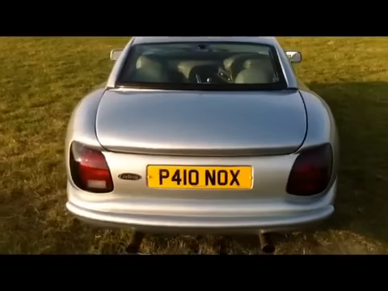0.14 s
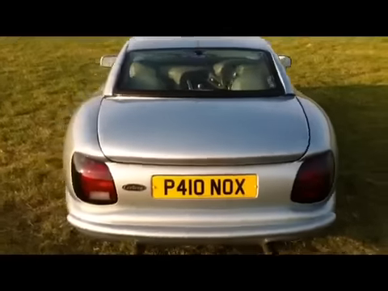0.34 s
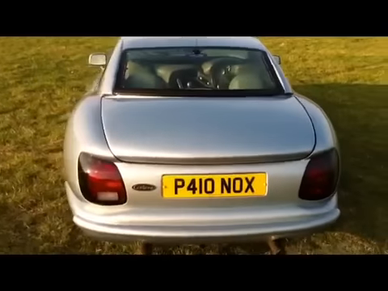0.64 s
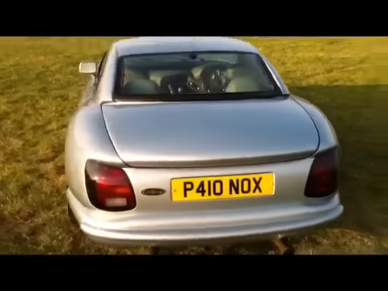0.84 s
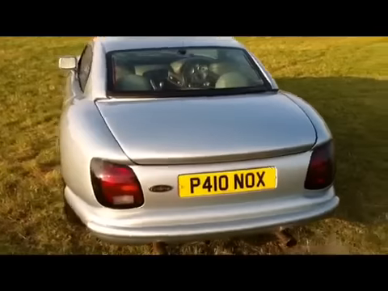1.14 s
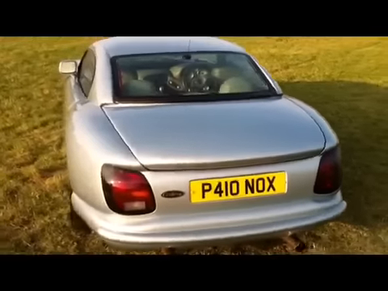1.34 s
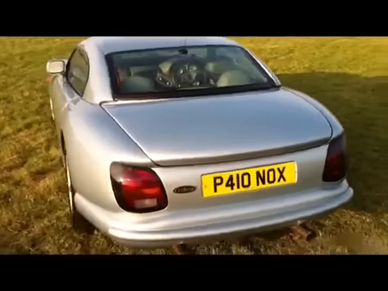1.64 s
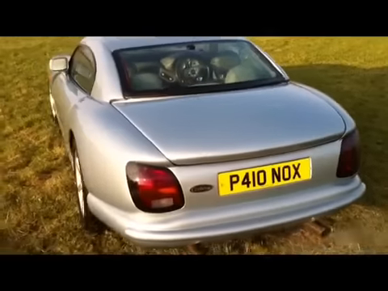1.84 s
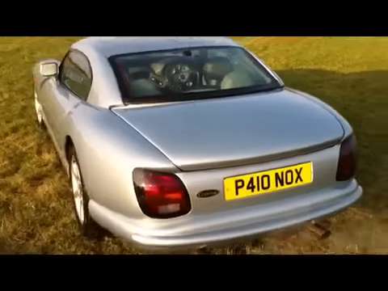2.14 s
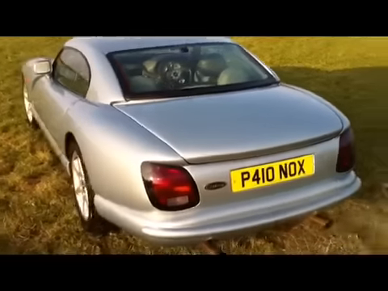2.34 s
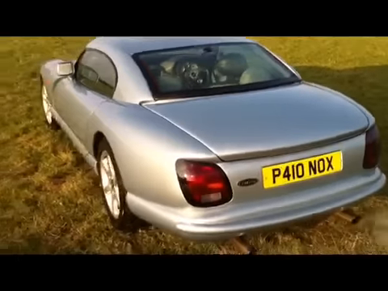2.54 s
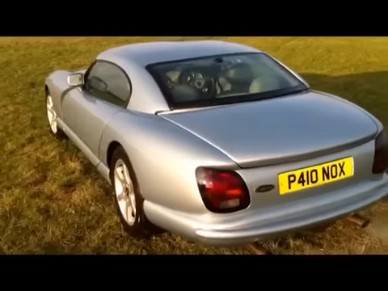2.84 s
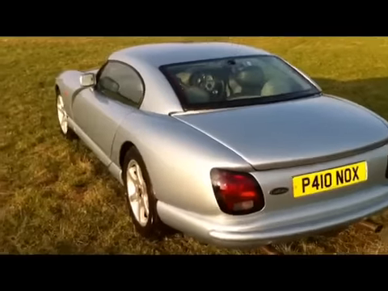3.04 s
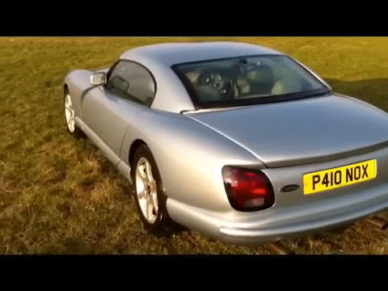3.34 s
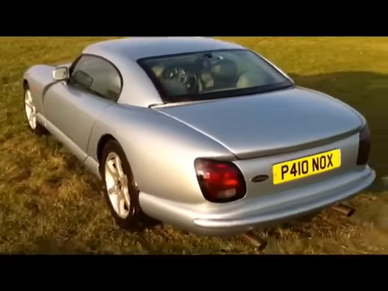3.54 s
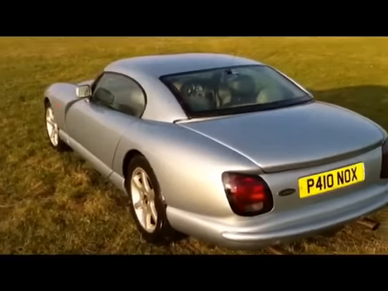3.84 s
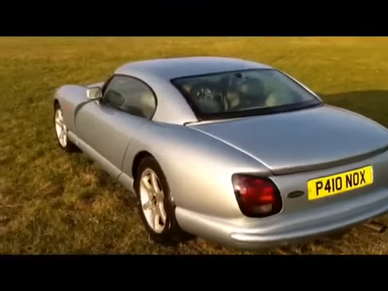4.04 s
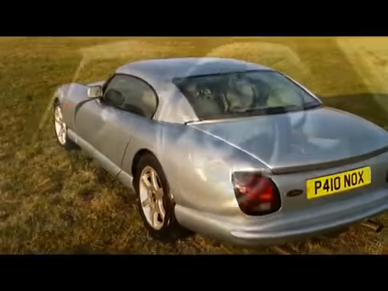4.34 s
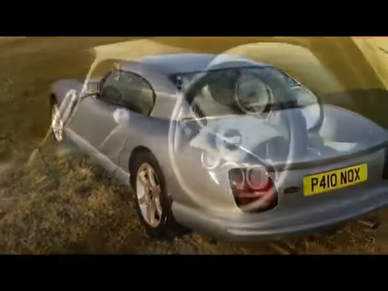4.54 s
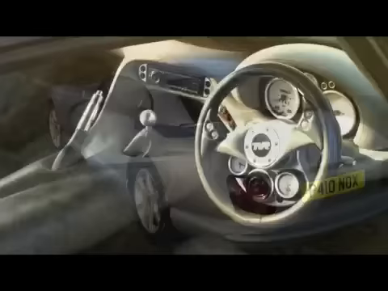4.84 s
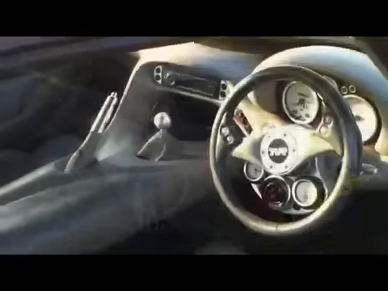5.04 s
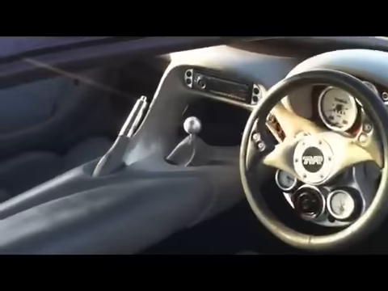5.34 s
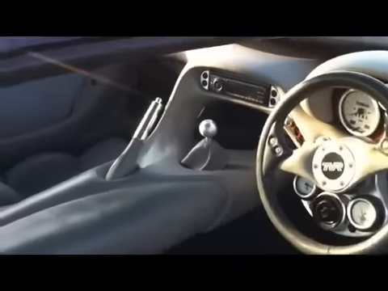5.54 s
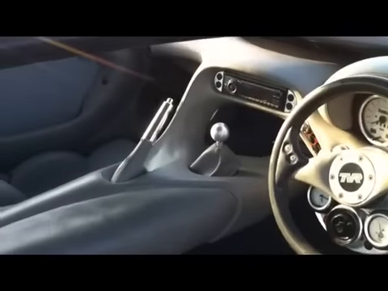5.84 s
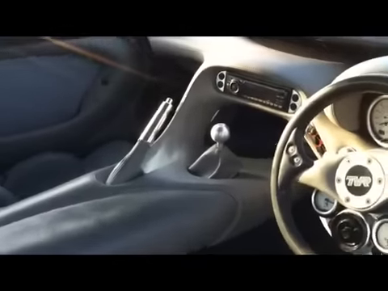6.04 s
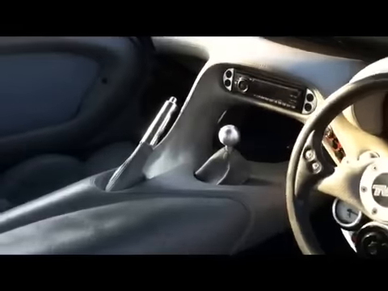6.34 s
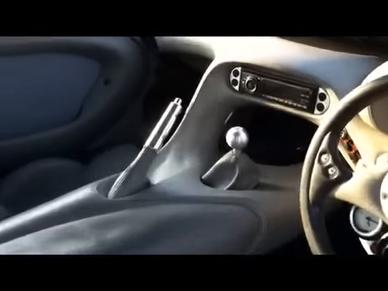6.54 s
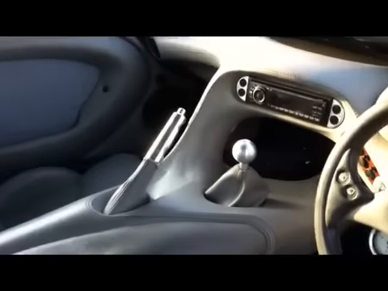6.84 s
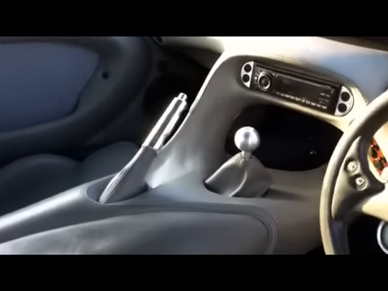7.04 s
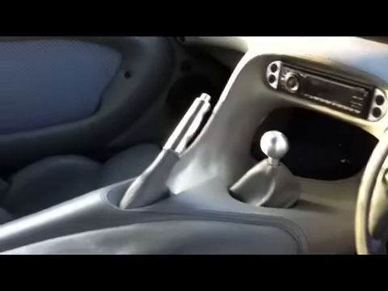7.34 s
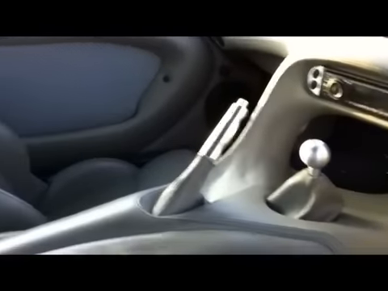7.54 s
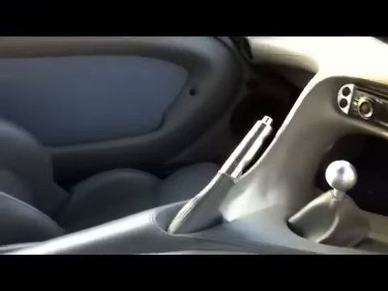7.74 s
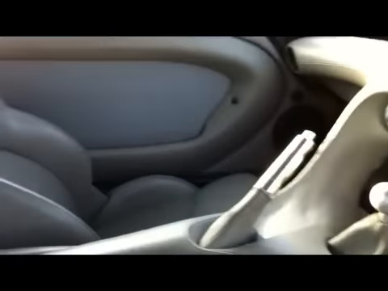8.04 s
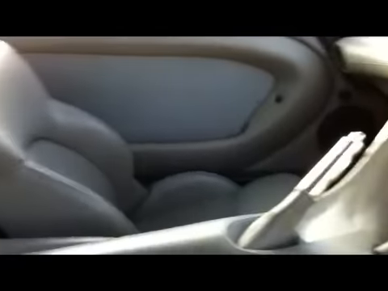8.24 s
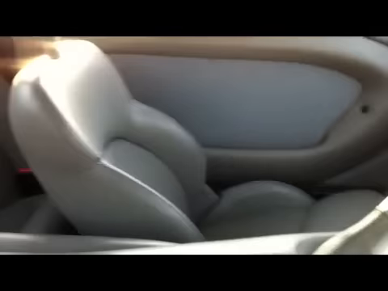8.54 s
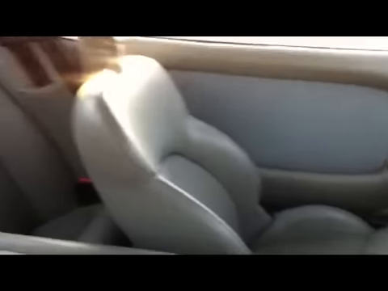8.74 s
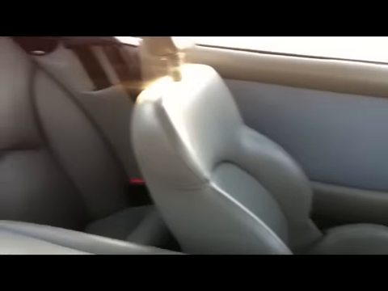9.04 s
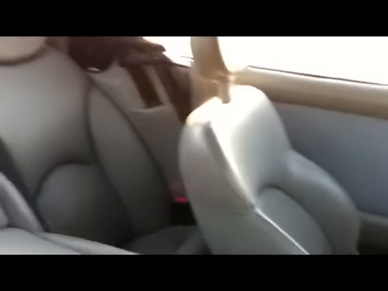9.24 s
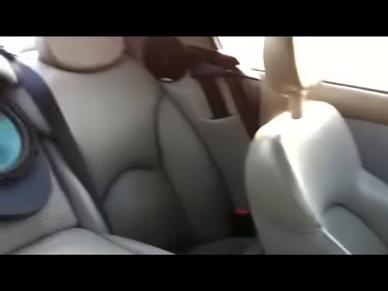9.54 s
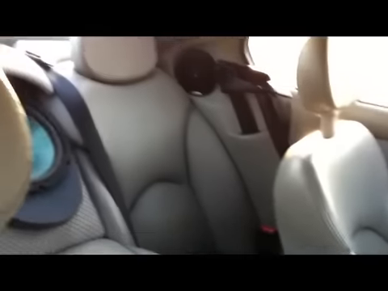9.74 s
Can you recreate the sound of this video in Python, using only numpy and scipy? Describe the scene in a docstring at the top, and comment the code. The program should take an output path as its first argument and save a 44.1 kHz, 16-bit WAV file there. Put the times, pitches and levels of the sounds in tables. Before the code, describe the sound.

Close, burbling sports car idle with crackling exhaust and ragged wind-like blasts, switching to a softer, hollow rumble and hiss at the open door.

```python
"""A sports car's eight-cylinder engine idles lumpily on a lawn. First it is heard at the tail pipes: spiked firings
ring pipe resonances and crack in the tips, gusts of exhaust gas (shaped noise) buffet the microphone, feet brush
the grass (noise bursts), and a whine from the engine bay (resonant noise) fades in. Then, overlapping for a second,
the same idle comes through the open door: a duller rumble and ring, the bay's noise hiss, and two taps on the trim."""
import sys
import numpy as np
from scipy import signal
from scipy.fft import rfft, irfft, next_fast_len
from scipy.io import wavfile
from scipy.ndimage import uniform_filter1d, minimum_filter1d, map_coordinates

SR = 44100
rng = np.random.default_rng(int(sys.argv[2]) if len(sys.argv) > 2 else 0)


def invert_db(x):
    """Field ratio 10**(x/20) for x, a level in decibels (scalar or array-like)."""
    u = np.asarray(x, float) / 20
    return 10 ** u


def pcm_store(signal):
    """Save signal as 16-bit PCM."""
    levels = np.round(np.clip(np.atleast_2d(signal), -1, 1) * 32767)
    wavfile.write(sys.argv[1], SR, levels.astype(np.int16).T)


N = 435708
REAR_ENDS_S, DOOR_STARTS_S = 5.165, 4.174
TOP_WIDTH_HZ = 19  # of the pipe's top ring

# Breathy bands from the engine bay. Each row: centre in Hz, width in Hz, relative level in dB, all per pass.
WHINE_BANDS = [(2376, 67, -1), (3520, 1830, -8.5), (11000, 1800, -14.5)]
# Steady engine orders. Each row: multiple of one bank's firing rate, rear and door level in dB over the rumble.
HUM_ORDERS = [(2, -21, -17.5), (3, -10.5, -12), (4, -14.5, -13)]


def unit(x):
    """Scale to rms 1."""
    return x / np.sqrt(np.mean(x ** 2) + 1e-20)


def curves(rows):
    """One value per sample for each column after the time."""
    time_s, *columns = np.transpose(rows)
    return [np.interp(np.arange(N) / SR, time_s, c) for c in columns]


def wobble(rate):
    """A smooth random curve, rate knots a second."""
    knots = rng.standard_normal(int(N * rate / SR) + 4)
    return map_coordinates(knots, [np.arange(N) * rate / SR])


def filtered(x, response):
    """x times a complex response of frequency."""
    m = next_fast_len(N + SR // 2)
    return irfft(rfft(x, m) * response(np.fft.rfftfreq(m, 1 / SR)), m)[:N]


def coloured(x, spectrum):
    """x through (Hz, dB) points on a log axis, rms 1."""
    f, db = np.transpose(spectrum)
    return unit(filtered(x, lambda hz: invert_db(np.interp(np.log(hz + 1), np.log(f), db, -120, -120))))


def resonant(x, modes):
    """x rings through (Hz, width Hz, dB) resonances of alternating sign, rms 1."""
    def response(f):
        return sum((-1) ** k * invert_db(db) * 1j * f * w / (c * c - f * f + 1j * f * w)
                   for k, (c, w, db) in enumerate(modes))
    return unit(filtered(x, response))


def wavering(x, centre_hz, width_hz):
    """x rings through one resonance whose centre moves, plus a sustained tone at that centre, rms 1."""
    sustained = .85  # amplitude of the tone beside a ring of rms 1
    phase = 2 * np.pi * np.cumsum(centre_hz) / SR

    def slow(v):
        return filtered(v, lambda hz: 1 / (1 + 2j * hz / width_hz))

    ring = slow(x * np.cos(phase)) * np.cos(phase) + slow(x * np.sin(phase)) * np.sin(phase)
    return unit(unit(ring) + sustained * np.cos(phase))


def puffs(train, t60, rise):
    """White noise that flares at each spike of the train and dies away; times in s."""
    t = np.arange(SR // 8) / SR
    shape = invert_db(-60 * t / t60) * (1 - np.exp(-t / rise))
    return signal.fftconvolve(train, shape / shape.max())[:N] * rng.standard_normal(N)


def bursts(rows, spectrum):
    """Coloured noise under (s, dB, t60 s, rise s) envelopes."""
    t, swell = np.arange(SR // 4) / SR, np.zeros(N + SR)
    for s, db, t60, rise in rows:
        shape = invert_db(-60 * t / max(t60, .002)) * (1 - np.exp(-t / max(rise, .0002)))
        swell[round(s * SR):][:len(t)] += invert_db(db) * shape / shape.max()
    return swell[:N] * coloured(rng.standard_normal(N), spectrum)


def mottled(depth_db):
    """White noise with patches of random gain, some hundred Hz wide and tens of ms long."""
    z = signal.stft(rng.standard_normal(N + 512), nperseg=512)[2]
    field = uniform_filter1d(rng.standard_normal(z.shape), size=5, axis=0)
    field = uniform_filter1d(field, size=9, axis=1)
    return signal.istft(z * invert_db(depth_db * unit(field)), nperseg=512)[1][:N]


def firings(speed, fires_s, other_db, scatter_db, jitter_s):
    """One spike per firing; the two banks alternate and a lumpy idle burns each charge differently."""
    beats = np.cumsum(curves(speed)[0]) / SR
    turns = 2 * (beats - beats[round(fires_s * SR)])
    at = np.flatnonzero(np.diff(np.floor(turns)))
    draw = rng.standard_normal((len(at), 2))
    bank_db = np.where(np.floor(turns[at + 1]) % 2, other_db, 0)
    size = invert_db(bank_db + scatter_db * draw[:, 0])
    jittered = at + (jitter_s * SR * draw[:, 1]).astype(int)
    return np.bincount(np.clip(jittered, 0, N - 1), size, N)


def rumble(fire, modes, rough, soft_hz):
    """Rounded pressure pulses ring the pipe, and the gas behind each one churns it at random."""
    churn = puffs(fire, t60=.13, rise=.003)
    drive = np.sqrt(1 - rough) * unit(fire) + np.sqrt(rough) * unit(churn)  # rough: share of power
    return resonant(filtered(drive, lambda hz: 1 / (1 + 1j * hz / soft_hz) ** 2), modes)


def hum(speed, orders):
    """Low engine orders as slightly unsteady tones."""
    beats = np.cumsum(curves(speed)[0]) / SR
    out = np.zeros(N)
    for k, db in orders:
        phase = 2 * np.pi * round(k) * beats + 1.06 * wobble(5)
        out += invert_db(db + 2.7 * wobble(6.6)) * np.sqrt(2) * np.sin(phase)
    return out


def cracks(train, scatter_db, t60, rise):
    """Each firing snaps and spits into the pipe tips, ringing every tip mode at a new strength."""
    # Pipe tips. Each row: centre in Hz, width in Hz, level from behind in dB, level from the side in dB.
    tips = [(1300, 170, 0, 0), (1700, 220, -2, -2), (2700, 220, -4, -15), (3250, 220, -14, -6),
            (4500, 500, -12, -12), (6300, 2200, -17, -19)]
    side = np.clip((np.arange(N) / SR - 2.6) / .5, 0, 1)  # from behind to the side
    at, out = np.flatnonzero(train), np.zeros(N)
    for hz, width, behind_db, side_db in tips:
        sized = np.zeros(N)
        sized[at] = train[at] * invert_db(scatter_db * rng.standard_normal(len(at)))
        drive = unit(puffs(sized, t60, rise)) + 0.7 * unit(sized)
        ringing = resonant(resonant(drive, [(hz, width, 0)]), [(hz, 5 * width, 0)])
        out += invert_db(behind_db + side * (side_db - behind_db)) * ringing
    return unit(out)


def tail_pipes():
    """Rumble, the crack of each firing at the pipe tips, a steady hiss and the bay's whine fading in."""
    # Layer levels. Each row: time in s, rumble in dB, crack in dB, hiss in dB.
    levels = [(0, -20.5, -63, -49), (.97, -18.5, -55.5, -46), (1.1, -22, -52.5, -50.5),
              (1.25, -19, -50, -48), (2.34, -16, -46, -46.5), (4.01, -18, -49.5, -45.5),
              (4.33, -17.5, -46, -41), (4.97, -15, -47, -45.5), (5.16, -11, -45, -40.5)]
    # The idle hunts a little. Each row: time in s, firings of one bank per second.
    speed = [(0, 34.85), (1.2, 34.95), (1.7, 34.3), (2.9, 34.45), (3.55, 35.1), (3.9, 34.15), (4.3, 34.55)]
    # Pipe resonances. Each row: centre in Hz, width in Hz, relative level in dB.
    pipe_modes = [(81, 18, -5.5), (108.4, 21, -1.5), (145.8, 22.5, -0.5), (165.8, 18.3, 3), (250, 71.4, -8),
                  (333, 89, -12), (405, 133, -26.5)]
    # The pipe's top ring wavers. Each row: time in s, mean centre in Hz, level in dB over the rumble.
    top_ring = [(1.25, 239.5, -1.5), (2.2, 262.4, -4.5), (2.5, 250, -10.5), (4.2, 243.9, -2.5),
                (4.5, 254.4, -8)]
    # The loudest firings. Each row: time in s, energy in dB.
    loudest = [(1.071, -14.5), (1.235, -12.5), (1.5591, -17), (1.794, -10.5), (1.94, -11.5), (1.998, -10.5),
               (2.144, -8.5), (2.227, -12), (2.366, -8.5), (2.811, -9), (3.0582, -9), (3.188, -9.5),
               (3.4055, -4), (3.98, -9.5), (4.0508, -7.5), (4.1416, -8)]
    # Hiss spectrum. Each row: frequency in Hz, relative density in dB.
    hiss_spectrum = [(350, -23), (600, -9.5), (716, 4.5), (1690, -0.5), (2100, -9), (3120, -13),
                     (7160, -19), (12400, -20), (15600, -29)]
    fires_s = .013  # the louder bank fires here
    whine_db, whine_from_s = -57.5, 0.87  # rises over one second

    rumble_db, crack_db, hiss_db = curves(levels)
    fire = firings(speed, fires_s, -7, 2.2, jitter_s=.0005)
    pipe = rumble(fire, pipe_modes, rough=.27, soft_hz=400)
    top_hz, top_db = curves(top_ring)
    top = wavering(pipe, top_hz + 7 * wobble(5), TOP_WIDTH_HZ)
    low = pipe + invert_db(top_db) * top + hum(speed, [(k, db) for k, db, _ in HUM_ORDERS])

    snaps = firings(speed, fires_s, -8, 2.5, jitter_s=.0007)
    crack = cracks(snaps, 4, t60=.028, rise=.0012)
    loud = np.zeros(N)
    for s, db in loudest:
        loud[round(s * SR)] = invert_db(db)
    pops = cracks(loud, 3, t60=0.092, rise=0.00034) * np.sqrt(np.mean(loud ** 2))

    hiss = invert_db(1.33 * wobble(9)) * coloured(mottled(2.8), hiss_spectrum)
    fade_in = np.clip(np.arange(N) / SR - whine_from_s, 0, 1)
    whine = fade_in * resonant(resonant(rng.standard_normal(N), WHINE_BANDS), WHINE_BANDS)
    return (invert_db(rumble_db) * low + invert_db(crack_db) * crack + pops
            + invert_db(hiss_db) * hiss + invert_db(whine_db) * whine)


def open_door():
    """The idle beside the cabin: rumble, a ring that yields to the cabin's hollow colour, bay hiss, trim taps."""
    # Rumble and pipe ring. Each row: time in s, rumble in dB, ring in dB, mean ring centre in Hz.
    levels = [(5.3, -26, -22.5, 263.8), (5.75, -23.5, -23.5, 238), (6.65, -24.5, -26.5, 262),
              (7.3, -25, -33.5, 238.8), (9.8, -23.5, -38, 243.3)]
    # The idle hunts a little. Each row: time in s, firings of one bank per second.
    speed = [(4.1, 35.05), (5.4, 35.2), (6, 35), (6.8, 35.35), (8, 34.95), (9, 34.6)]
    # Pipe resonances, the silencer's lower ring, the open cabin's hollow colour.
    # Each row: centre in Hz, width in Hz, relative level in dB (lower ring: over the wavering ring).
    pipe_modes = [(66.5, 93, -8.5), (109.4, 22.6, 2), (154.2, 36.4, 0.5), (182.8, 42, 0), (235.3, 51, -9),
                  (342, 117, -12.5)]
    lower_ring = [(220.3, 11, -4.5)]
    cabin_modes = [(554, 270, -2.5), (724, 196, -2.5)]
    # Spectra of bay hiss, tap ticks and tap knocks. Each row: frequency in Hz, relative density in dB.
    bay_spectrum = [(240, -4.5), (400, 0.5), (684, -8.5), (958, -9.5), (1100, -6.5), (1450, -9.5),
                    (1590, -13.5), (2290, -21), (2510, -18), (3750, -27), (9980, -38), (15600, -38)]
    trim_spectrum = [(1500, -14), (3000, -2), (4600, 2), (8000, -9), (13000, -25)]
    knock_spectrum = [(300, -14), (750, 2), (1350, -1), (3000, -19)]
    # Taps on the trim. Each row: time in s, tick in dB, t60 in s, rise in s, knock in dB.
    taps = [(8.7214, -32.5, 0.05, 0.00087, -32), (9.266, -55, 0.081, 0.01, -31.5),
            (9.274, -42.5, .035, .001, -46)]
    fires_s = 4.1094  # the louder bank fires here
    bay_db = -39
    whine_db, whine_follows = -1, 0.6  # over the bay hiss; dB per dB of ring
    cabin_db, cabin_follows = -61, -0.56  # dB per dB of ring: grows as the ring fades

    rumble_db, ring_db, ring_hz = curves(levels)
    fire = firings(speed, fires_s, -9, 1.8, jitter_s=.0006)
    low = rumble(fire, pipe_modes, rough=.25, soft_hz=700)
    low += hum(speed, [(k, db) for k, _, db in HUM_ORDERS])
    ring = invert_db(lower_ring[0][2]) * rumble(fire, lower_ring, rough=0.59, soft_hz=397)
    ring += wavering(low, ring_hz + 7 * wobble(5), TOP_WIDTH_HZ)
    cabin = rumble(fire, cabin_modes, rough=.8, soft_hz=1500)

    pulsing = (1 + 0.097 * unit(puffs(fire, t60=0.079, rise=0.0036)) ** 2) ** .5
    swell = invert_db(0.83 * wobble(16)) * pulsing
    bay = unit(swell * coloured(mottled(1.8), bay_spectrum))
    # the bay is screened as the microphone leans in
    bay += invert_db(whine_db + whine_follows * ring_db) * resonant(mottled(2.2), WHINE_BANDS)

    ticks = bursts([(s, db, t60, rise) for s, db, t60, rise, _ in taps], trim_spectrum)
    knocks = bursts([(s, db, t60, rise) for s, _, t60, rise, db in taps], knock_spectrum)
    dip = 1 - .8 * np.exp(-((np.arange(N) / SR - 5.2) / .022) ** 2)  # rumble and ring dip briefly
    return (dip * (invert_db(rumble_db) * low + invert_db(ring_db) * ring) + invert_db(bay_db) * bay
            + invert_db(cabin_db + cabin_follows * ring_db) * cabin + ticks + knocks)


def slaps(flow):
    """Each eddy that slaps the microphone sucks its membrane out and lets it swing once or twice."""
    # Single strong slaps. Each row: time in s, peak in dB, swing in Hz.
    strong = [(0.088, -4, 530), (0.195, -4, 497.5), (0.462, -20, 440), (.593, -2.5, 520),
              (1.222, -12.5, 433), (1.27, -13, 500), (1.518, 5, 560), (2.142, -12, 466), (2.213, -20, 420),
              (2.293, -9.5, 519), (3.014, -9, 372), (4.826, -9, 435), (5.047, -5.5, 427)]
    per_s, over_flow_db = 55, 6  # lesser slaps: rate, highest peak over the flow
    cycles = 3.7  # swings until 60 dB down
    t, out = np.arange(SR // 25) / SR, np.zeros(N)
    lesser = []
    for u, v, w in rng.uniform(size=(int(per_s * REAR_ENDS_S), 3)):
        s = REAR_ENDS_S * u
        flow_db = 20 * np.log10(flow[int(s * SR)])
        lesser.append((s, over_flow_db - 12 * v + flow_db, 400 * (1 + w)))
    for s, db, hz in [*strong, *lesser]:
        swing = -np.sin(2 * np.pi * hz * t) * invert_db(-60 * t * hz / cycles) * (1 - np.exp(-t / 0.0004))
        out[round(s * SR):][:len(t)] += invert_db(db) * swing / np.abs(swing).max()
    return out


def buffeting():
    """Eddies of exhaust gas hit the microphone in ragged lumps; the stronger the gust, the brighter it tears."""
    # Gas streaming past. Each row: time in s, mean flow in dB.
    stream = [(0, -21), (.96, -22), (1.01, -32.5), (4.3, -37), (4.5, -29), (5.1, -22)]
    # Gusts that strike the microphone. Each row: start in s, nominal length in s, flow in dB.
    gusts = [(0, 0.083, -12.5), (0.085, 0.078, -11), (0.187, 0.041, -13.5), (0.234, 0.026, -17.5),
             (0.26, 0.023, -15.5), (0.341, 0.16, -13), (0.582, 0.05, -14.5), (0.651, 0.022, -17),
             (0.687, 0.093, -19), (0.786, 0.04, -16.5), (0.898, 0.079, -14), (1.248, 0.03, -14.5),
             (1.373, 0.03, -15), (1.442, 0.031, -17), (1.475, 0.063, -12.5), (2.14, 0.039, -17),
             (2.21, 0.074, -18), (3.394, 0.07, -18.5), (3.47, 0.017, -22), (5.03, 0.025, -21)]
    # Spectra of the lumps and of the torn edge. Each row: frequency in Hz, relative density in dB.
    gas_spectrum = [(70, -10), (150, 6), (260, 4), (480, -3), (900, -28), (2000, -48)]
    torn_spectrum = [(300, -36), (700, 9), (1500, -5.5), (3000, -25.5), (7000, -39)]
    rise_s = 0.0038
    tear_db, tear_power = -1.7, 2.23  # the torn edge grows as about the square of the flow

    t = np.arange(N) / SR
    flow = invert_db(curves(stream)[0] + 4.3 * wobble(29.895))
    for s, length, db in gusts:
        onset = np.clip((t - s) / rise_s + .5, 0, 1)
        release = np.clip((s + length - t) / (.5 * length) + 0.38, 0, 1)
        flow += invert_db(db) * onset * release
    eddies = invert_db(np.minimum(2 * wobble(50) + 4.5 * wobble(200), 5))
    lumps = unit(eddies * coloured(rng.standard_normal(N), gas_spectrum))
    torn = unit(eddies * invert_db(4.5 * wobble(350)) * coloured(rng.standard_normal(N), torn_spectrum))
    return flow * lumps + invert_db(tear_db) * flow ** tear_power * torn + slaps(flow)


def footsteps():
    """Shoes brush the grass: short soft-edged hisses, the fainter ones at random times."""
    # The loudest brushes. Each row: time in s, level at the envelope's peak in dB.
    brushes = [(.3825, -45), (0.4955, -47), (1.409, -46), (1.698, -45), (2.023, -52), (3.179, -48),
               (3.475, -47.5)]
    # Grass spectrum. Each row: frequency in Hz, relative density in dB.
    grass_spectrum = [(1500, -22), (3000, 4), (5500, 0.5), (12000, -7.5), (15700, -12)]
    small_db, t60_s, rise_s = -45.5, 0.081, 0.0088  # small_db: loudest of the fainter ones
    small = [(DOOR_STARTS_S * u, small_db - 4 * v) for u, v in rng.uniform(size=(9, 2))]
    return bursts([(s, db, t60_s, rise_s) for s, db in [*brushes, *small]], grass_spectrum)


def scene():
    """The rear and door positions overlap for a second, each with a hard edge."""
    t = np.arange(N) / SR
    rear = tail_pipes() + buffeting() + footsteps()
    rear_gate = np.clip((REAR_ENDS_S - t) / 0.0055, 0, 1)
    return (rear * rear_gate + open_door() * (t > DOOR_STARTS_S))[None]


def band_limit(x):
    """A steep low-pass at the top of the band."""
    return signal.sosfilt(signal.butter(12, 15720, fs=SR, output="sos"), x)


def record(dry):
    """A steep low cut with a faint flat leak; a fast limiter follows, the highest peaks clip."""
    cut_hz, leak_db, ceiling_db = 62, -48.0, -2

    def low_cut(hz):
        steep = 1 / (1 + 1.92 * cut_hz / (1j * hz + 1e-3) - (cut_hz / (hz + 0.001)) ** 2) ** 2
        return steep + invert_db(leak_db)

    cut = filtered(dry[0], low_cut)
    need = np.minimum(1, invert_db(ceiling_db) / (np.abs(cut) + 1e-9))
    limited = cut * uniform_filter1d(minimum_filter1d(need, size=441), size=441)  # 10 ms windows
    clipped = limited / (1 + np.abs(limited / .71) ** 24) ** (1 / 24)
    return band_limit(clipped[None])


dry = scene()
out = record(dry)
pcm_store(out)
```